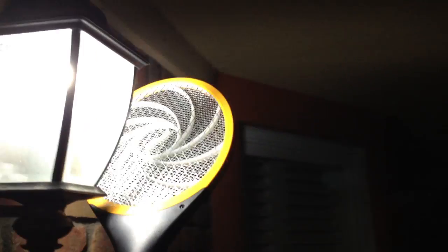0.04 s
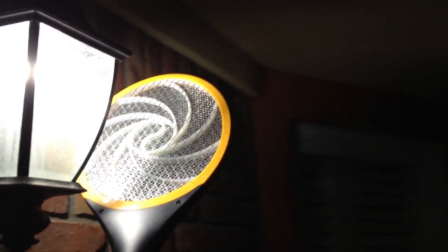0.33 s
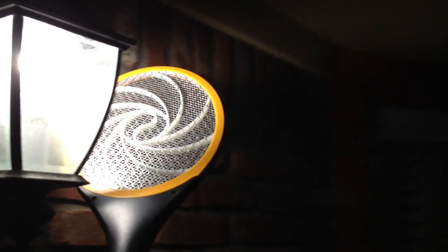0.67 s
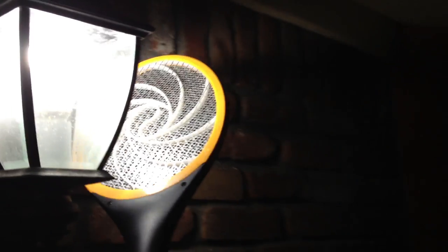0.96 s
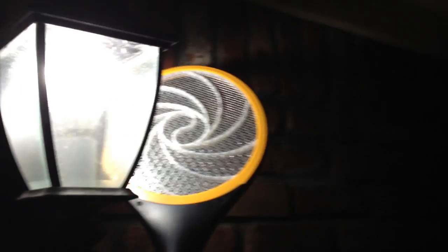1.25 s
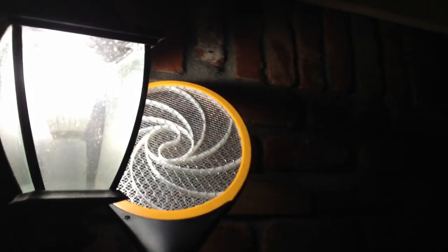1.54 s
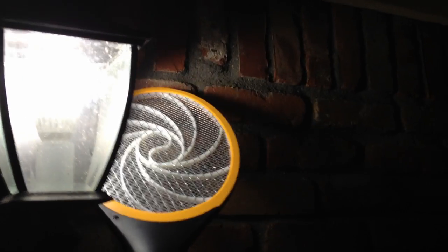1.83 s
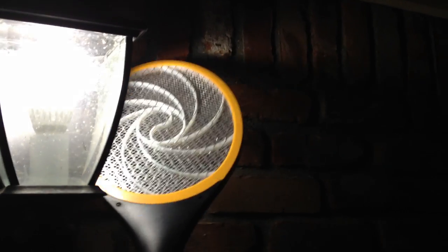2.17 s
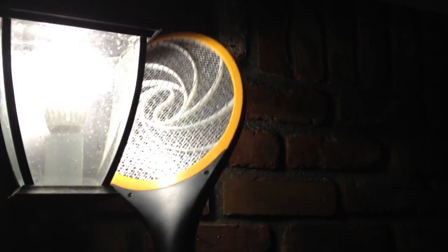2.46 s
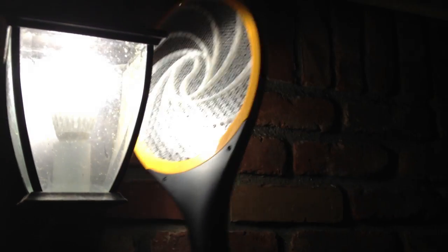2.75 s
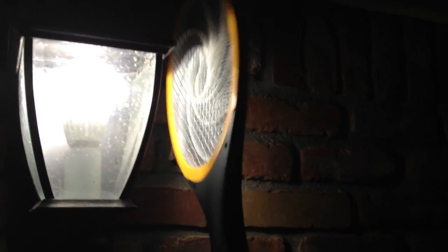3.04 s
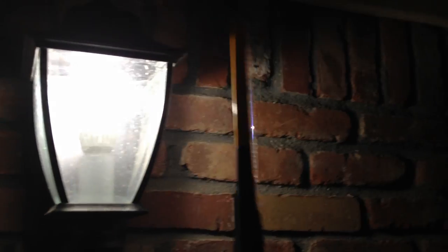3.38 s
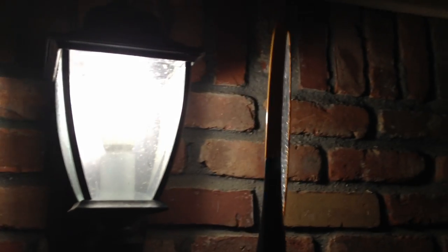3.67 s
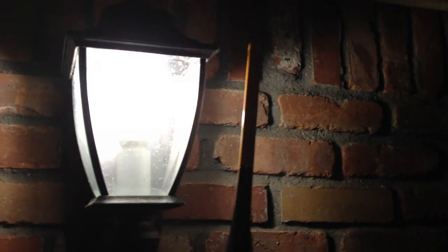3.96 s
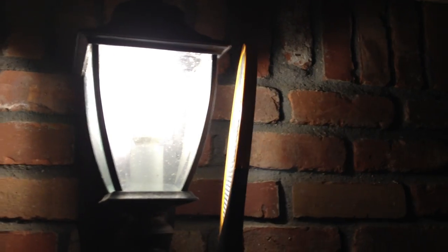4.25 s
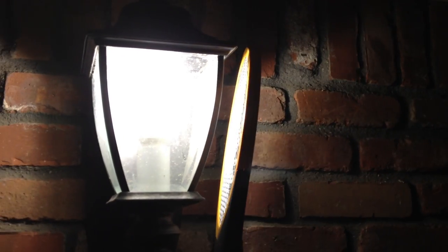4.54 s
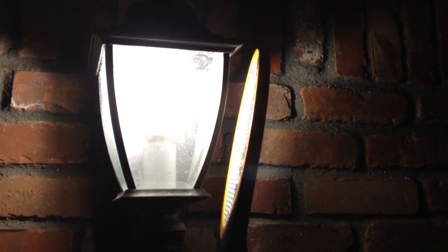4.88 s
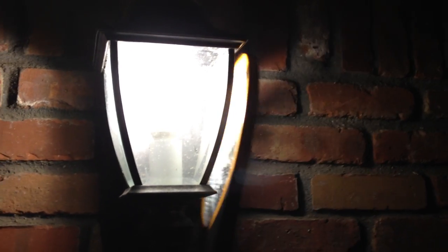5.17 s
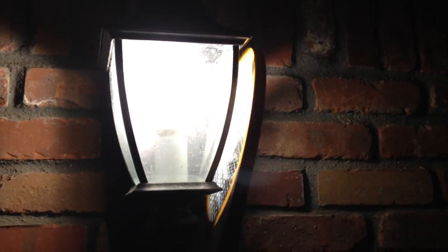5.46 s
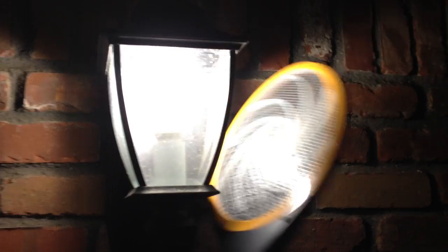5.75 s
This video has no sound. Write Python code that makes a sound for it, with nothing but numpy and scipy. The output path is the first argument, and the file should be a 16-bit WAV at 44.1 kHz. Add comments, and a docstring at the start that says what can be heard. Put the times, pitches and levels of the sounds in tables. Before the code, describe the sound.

An electric insect swatter snaps sharply six times beside a porch lantern at night, over a faint steady chorus of crickets.

```python
"""A porch at night, beside a lantern, with one microphone close to an electric swatter.
Six insects short its grid: each spark cracks, thumps the microphone and rings off the brick wall and eaves.
The racket's plastic rim bumps and brushes the metal lantern. Crickets near and far rub their wings
in a steady chorus over a distant rumble; gain control ducks them after every spark."""
import sys
import numpy as np
from scipy import signal
from scipy.fft import rfft, irfft
from scipy.io import wavfile
from scipy.ndimage import uniform_filter1d

SR = 44100
rng = np.random.default_rng(int(sys.argv[2]) if len(sys.argv) > 2 else 0)


def wav_out(sig):
    """Save sig, one row per channel (or a flat mono array), as 16-bit PCM at SR to the path in sys.argv[1]."""
    wavfile.write(sys.argv[1], SR, np.round(np.clip(np.atleast_2d(sig).T, -1, 1) * 32767).astype(np.int16))


N = 256220


def sparks(front_db=18, sizzle_db=6, porch_db=1, wall_echo=0.46, arc_s=0.0024, linger_s=0.019):
    """Close up: a shock front and its echo, a brief sizzle, and a shove that swings the microphone."""
    # one row a spark, levels relative: start_s, shock_db, arc_db, edge_hz, thump_db, top_hz, echo_s
    discharges = [(1.3858, -12, 2, 3700, 1, 470, 0.0014), (2.058, -5, 0.5, 1500, 2, 1400, 0.001),
                  (3.4587, -5.5, 5.5, 917, 12.5, 4030, 0.00097), (4.2001, -5.5, -5, 1114, 7.5, 2470, .0014),
                  (4.4970, 1.5, -4.5, 1870, 7, 694, 0.0011), (5.3522, -4, -0.5, 1700, -2.5, 1015, 0.0012)]
    # colour of a spark heard directly: frequency_hz, gain_db
    crack_colour = [(100, -28.5), (400, -2.5), (1300, 3.5), (2800, -4.5), (4300, -3), (5500, -5), (6200, 1),
                    (8300, 1.5), (9800, -4.5), (13500, 4.5), (15300, -7.5)]
    out, t = np.zeros(N), np.arange(SR * 3 // 5) / SR
    for start_s, shock_db, arc_db, edge_hz, thump_db, top_hz, echo_s in discharges:
        front = np.zeros(len(t))
        front[0], front[round(echo_s * SR)] = 1, wall_echo
        burning = amp(arc_db) / (1 + (t / arc_s) ** 8) + amp(-17) * np.exp(-t / linger_s)
        rise_s = 0.0003 * amp(thump_db)  # a heavier discharge builds more slowly
        sizzle = np.tanh(2 * rng.standard_normal(len(t))) * np.minimum(t / rise_s, 1) * burning
        sizzle = signal.lfilter(*signal.butter(2, edge_hz, "high", fs=SR), sizzle)
        crack = colour(amp(front_db + shock_db) * front + amp(sizzle_db) * sizzle, crack_colour)
        # the microphone passes no steady pressure, so the shove rebounds as one low swing
        shove = signal.lfilter(*signal.butter(1, top_hz, fs=SR), -1. * (t < echo_s))
        thump = signal.lfilter(*signal.butter(2, 145, "high", fs=SR), shove)
        thump = signal.lfilter(*signal.butter(2, 95, "high", fs=SR), thump)
        add(out, start_s, crack + amp(thump_db) * thump + amp(porch_db) * porch_tail(t))
    return out


def porch_tail(t, early_db=-14, early_t60_s=0.13, late_db=-24, build_s=0.0053):
    """Quick echoes off wall and eaves give way to a thinner wash; each band dies at its own speed."""
    # colour of a spark heard off the porch: frequency_hz, gain_db
    porch_colour = [(80, -32.5), (220, -12.5), (600, -10.5), (1300, -12), (3000, -4.5), (5500, 1),
                    (7000, 2.5), (8400, 3), (9700, -2), (11500, 3), (13500, 0), (15300, -5.5)]
    # reverberation time of the porch: frequency_hz, t60_s
    porch_decay = [(150, 0.2), (700, 0.31), (2000, 0.41), (4000, 0.42), (7000, 0.4), (15000, 0.38)]
    hz, age_s, bands = signal.stft(rng.standard_normal(len(t)), SR, nperseg=256)
    bands *= amp(-60 * age_s / read(porch_decay, hz)[:, None])
    echoes = signal.istft(bands, SR, nperseg=256)[1][:len(t)]
    strength = (amp(early_db - 60 * t / early_t60_s) + amp(late_db)) * np.minimum(t / build_s, 1)
    return colour(echoes * strength, porch_colour)


def knocks(chatter_db=-36, rattle_depth=0.53):
    """The plastic rim bumps the lantern; the place of contact decides which modes ring most."""
    # one row a bump: start_s, force_db, ring_db, ring_centre_hz
    bumps = [(1.188, 2.5, -41.5, 610), (1.592, -2, -41.5, 408), (2.143, -7, -39, 646),
             (2.768, -3.5, -47, 397)]
    # modes of the lantern's frame and panes: pitch_hz, level_db, t60_s
    lantern_modes = [(310, 0, 0.25), (387, -5, 0.36), (453.4, 0.5, 0.29), (585, -0.5, 0.38),
                     (784, -2.5, 0.19), (914, 7.5, 0.069)]
    out, t = np.zeros(N), np.arange(SR // 2) / SR
    for start_s, force_db, ring_db, ring_centre_hz in bumps:
        # softer knocks are slower and duller
        rise_s, chatter_hz = 0.0044 * amp(-force_db), 4400 * amp(force_db / 4)
        chatter = rasp(t, rise_s, t60_s=0.27, centre_hz=chatter_hz, focus_db=8)
        ring = np.zeros(len(t))
        for pitch_hz, level_db, t60_s in lantern_modes:
            decay = amp(level_db + focus(pitch_hz, ring_centre_hz, depth_db=13) - 60 * t / t60_s)
            rattle = 1 + rattle_depth * drift(t, 70)  # loose panes make each mode ring unevenly
            ring += decay * rattle * np.sin(2 * np.pi * (pitch_hz * t + rng.random()))
        ring *= np.minimum(t / rise_s, 1)
        add(out, start_s, amp(chatter_db + force_db) * chatter + amp(ring_db) * ring)
    return out


def brushes():
    """The rim slides over the lantern too lightly to make it ring."""
    # one row a slide: start_s, level_db, stroke_s, centre_hz
    slides = [(.643, -52, 0.0031, 3780), (.937, -45, 0.049, 6600), (1.0, -45.5, 0.029, 2880),
              (1.503, -43, 0.022, 2730), (1.88, -49.5, 0.02, 6800), (1.953, -42, 0.026, 5800),
              (5.24, -47, 0.0042, 3970)]
    out, t = np.zeros(N), np.arange(SR // 2) / SR
    for start_s, level_db, stroke_s, centre_hz in slides:
        t60_s = 0.069 + 6.3 * stroke_s
        add(out, start_s, amp(level_db) * rasp(t, stroke_s, t60_s, centre_hz, focus_db=15.5))
    return out


def rasp(t, rise_s, t60_s, centre_hz, focus_db, grain_db=0.5):
    """Plastic chatters on metal: grainy noise that swells and dies."""
    # spectrum of the contact: frequency_hz, relative_db
    spectrum = [(150, -24.5), (380, -5.5), (600, 3), (880, 5.5), (1200, 4.5), (2000, 1.5), (4000, -2.5),
                (7000, -2.5), (10000, -8.5), (15000, -5)]
    contact = np.minimum(t / rise_s, 1) * amp(-60 * np.maximum(t - rise_s, 0) / t60_s)
    roughness = unit(uniform_filter1d(rng.standard_normal(len(t)), size=60))
    grain = unit(amp(grain_db * roughness))
    return contact * grain * noise(lambda hz: read(spectrum, hz) + focus(hz, centre_hz, focus_db), len(t))


def cricket_trills(rate_hz=60, glide_hz=330, wander_hz=40, direct=0.43, t60_s=0.297, fade_s=.08):
    """The nearest crickets trill and rest, heard mostly as echoes that blur the wing strokes."""
    # one row a cricket: first_s, period_s, length_s, pitch_hz, level_db
    singers = [(0.773, 1.034, 0.37, 5200, -54), (0.4, .85, 0.44, 5370, -58.5),
               (.82, 1.39, 0.357, 4890, -55.5)]
    # slow swell over all the trills: time_s, gain_db
    swell = [(0, 1), (1.0, 3.5), (2.0, -2.5), (3.1, -2), (4.0, 0), (4.7, 1), (5.2, 2.5), (5.8, 3.5)]
    out, t = np.zeros(N), np.arange(N) / SR
    for first_s, period_s, length_s, pitch_hz, level_db in singers:
        since_s = (t - first_s) % period_s
        singing = np.clip(np.minimum(since_s, length_s - since_s) / fade_s, 0, 1)
        call = stridulate(t, pitch_hz + wander_hz * drift(t, 2), rate_hz, glide_hz, waver_db=5.5)
        echoes = rng.standard_normal(N) * amp(-60 * t / t60_s)
        call = direct * call + signal.fftconvolve(call, echoes / np.linalg.norm(echoes))[:N]
        out += amp(level_db) * unit(call) * singing
    return out * amp(np.interp(t, *np.transpose(swell)))


def cricket_chorus(near_db=-2, far_db=-1, top_hz=7080):
    """Further out, three crickets stand out of each group; the many far ones merge into a band."""
    # one row a group: pitch_hz, spread_hz, level_db, stroke_rate_hz
    groups = [(2622, 55, -68.5, 35), (2870, 55, -65, 56), (4898, 140, -59.5, 62), (5270, 120, -55.5, 55),
              (6410, 85, -52.5, 72), (6476, 240, -53.5, 56)]
    out, t = np.zeros(N), np.arange(N) / SR
    for pitch_hz, spread_hz, level_db, stroke_rate_hz in groups:
        near = sum(stridulate(t, pitch_hz + side * spread_hz, stroke_rate_hz, glide_hz=2 * spread_hz)
                   for side in (-1, 0, 1))
        far = noise(lambda hz: -32 * np.log10(1 + ((hz - pitch_hz) / spread_hz) ** 2 / 7), N)
        out += amp(level_db) * (amp(near_db) * unit(near) + amp(far_db) * far)
    return signal.oaconvolve(out, signal.firwin(255, top_hz, fs=SR), "same")


def stridulate(t, pitch_hz, rate_hz, glide_hz, waver_db=5.0):
    """One cricket at its own pace near rate_hz: every wing stroke is a short falling note."""
    first_phase = rng.random()
    pace_hz = rate_hz * rng.uniform(.75, 1.25) * (1 + .06 * drift(t, 8))
    stroke = (first_phase + np.cumsum(pace_hz) / SR) % 1
    carrier_hz = pitch_hz + glide_hz * (.5 - stroke + .17 * drift(t, 60))
    pulses = np.sin(np.pi * stroke) ** 4 * amp(waver_db * drift(t, 9))
    return pulses * np.sin(2 * np.pi * np.cumsum(carrier_hz) / SR)


def night_air(air_db=-54.5, waver_db=1.48, hum_hz=229.5, hum_db=-62, hum_width_hz=3):
    """A soft, far rumble with a wavering hum and a trace of hiss."""
    # spectral density of the night air: frequency_hz, relative_db
    spectrum = [(25, -41), (60, -23.5), (110, -5.5), (160, 1.5), (230, -2), (340, -7.5), (600, -9.5),
                (1000, -13), (2000, -20.5), (4000, -23.5), (7000, -45.5), (9000, -36), (15000, -30.5)]
    air = amp(air_db + waver_db * drift(np.arange(N) / SR, 21)) * noise(lambda hz: read(spectrum, hz), N)
    hum = noise(lambda hz: -20 * np.log10(1 + ((hz - hum_hz) / hum_width_hz) ** 2), N)
    return air + amp(hum_db) * hum


def amp(db):
    """Decibels to gain."""
    return 10 ** (np.asarray(db) / 20)


def unit(x):
    """Scales to rms 1."""
    return x / np.sqrt(np.mean(x ** 2) + 1e-20)


def read(points, hz):
    """Reads a table on a log-frequency axis."""
    table_hz, value = np.transpose(points)
    return np.interp(np.log(hz + 1), np.log(table_hz + 1), value)


def add(mix, start_s, sound):
    """Mixes a sound in at a time."""
    part = mix[max(round(start_s * SR), 0):][:len(sound)]
    part += sound[:len(part)]


def noise(spectrum_db, size):
    """Noise of rms 1 whose spectrum is a function of frequency."""
    gain = amp(spectrum_db(np.fft.rfftfreq(size, 1 / SR)))
    return unit(irfft(rfft(rng.standard_normal(size)) * gain, size))


def colour(x, points, size=2048):
    """Causal filter that keeps the energy of a click."""
    log_gain = np.log(amp(read(points, abs(np.fft.fftfreq(size, 1 / SR)))))
    minimum_phase = np.exp(np.conj(signal.hilbert(log_gain)))
    taps = np.fft.ifft(minimum_phase).real[:size // 2]
    return signal.fftconvolve(x, taps / np.linalg.norm(taps))[:len(x)]


def drift(t, per_s):
    """A random wander of about unit size, with per_s turning points a second."""
    knots = np.arange(0, t[-1] + 1, 1 / per_s)
    return np.interp(t, knots, rng.standard_normal(len(knots)))


def focus(hz, centre_hz, depth_db):
    """Lowers, in dB, what lies more than about an octave from a centre."""
    return depth_db * (np.exp(-np.log2((hz + 1) / centre_hz) ** 2) - 1)


def gain_control(x, threshold_db=-14.0, recovery_s=0.72):
    """A spark turns the gain down at once, the stronger the further; it creeps back in a second or two."""
    power = abs(uniform_filter1d(x ** 2, size=280))
    over_db = np.maximum(10 * np.log10(power + 1e-12) - threshold_db, 0)
    fade = np.exp(-np.arange(N) / SR / recovery_s)
    duck_db = np.maximum.accumulate(over_db / fade) * fade
    return x * amp(-uniform_filter1d(duck_db, size=32))


def scene():
    """Swatter and lantern in front, crickets and air behind, all on one microphone."""
    return (sparks() + knocks() + brushes() + cricket_chorus() + cricket_trills() + night_air())[None]


def record(dry, ceiling=.72, edge_hz=15550):
    """The recorder: gain control, soft overload and a band limit."""
    saturated = ceiling * np.tanh(gain_control(dry[0]) / ceiling)
    low_pass = signal.firwin(801, edge_hz, window=("kaiser", 8), fs=SR)
    return signal.oaconvolve(saturated, low_pass, "same")[None]


dry = scene()
out = record(dry)
wav_out(out)
```